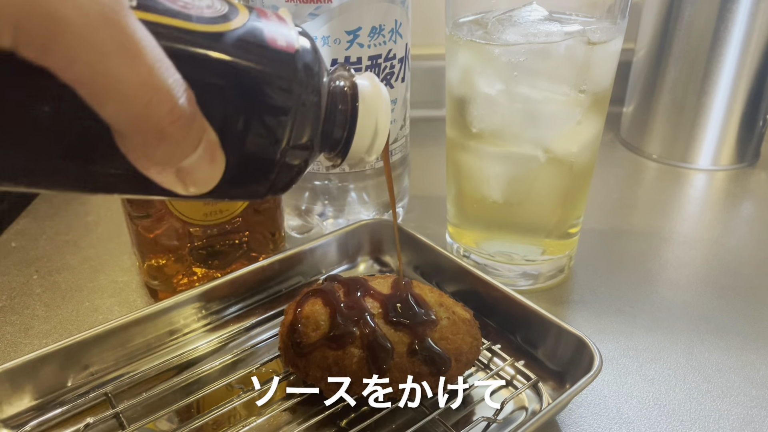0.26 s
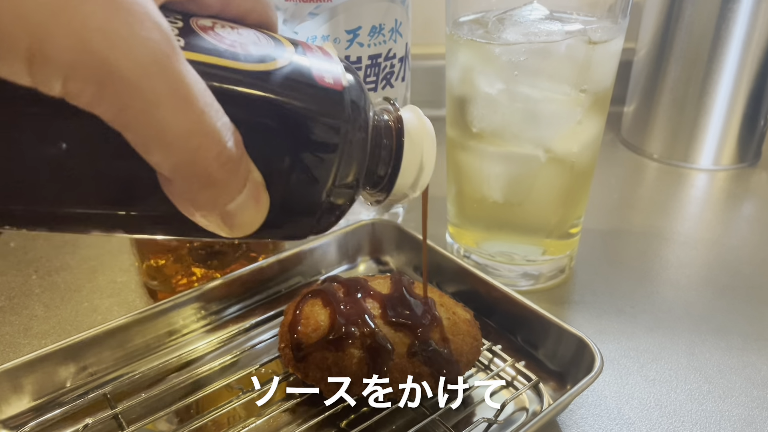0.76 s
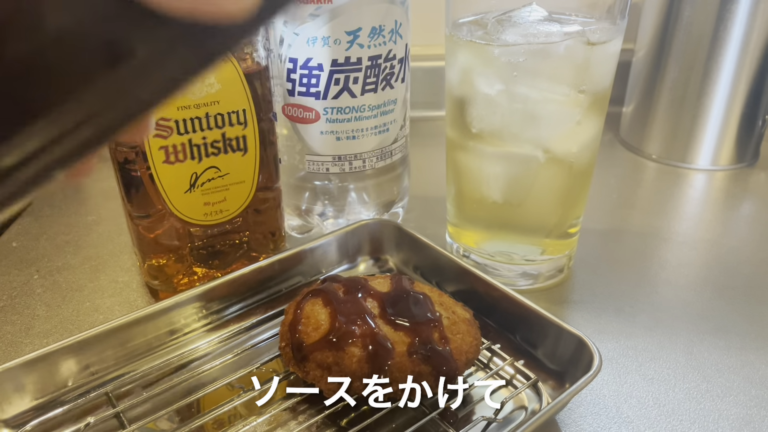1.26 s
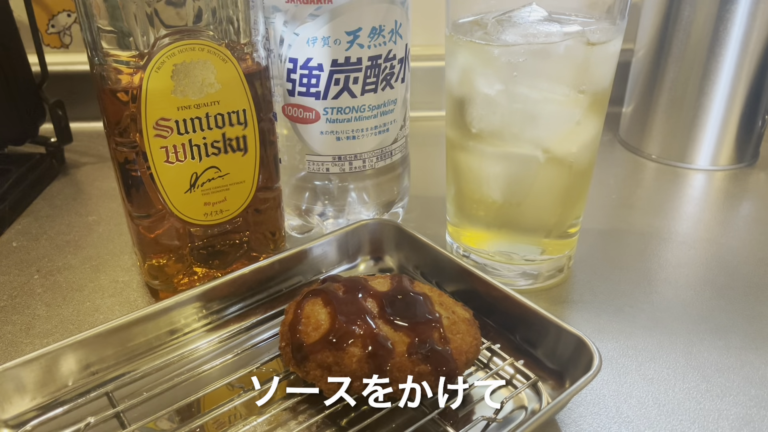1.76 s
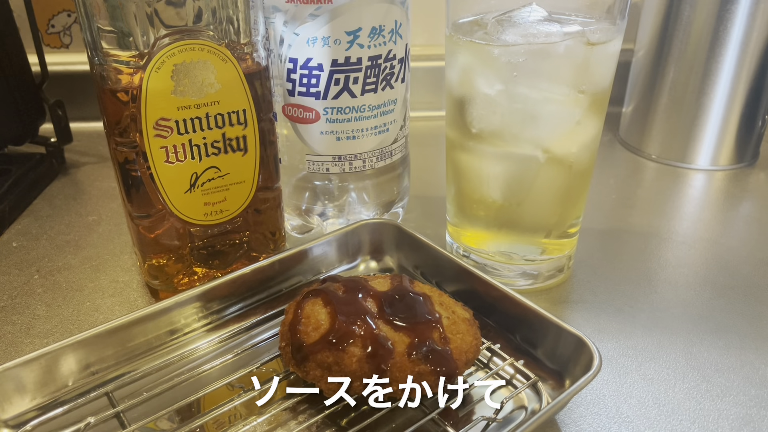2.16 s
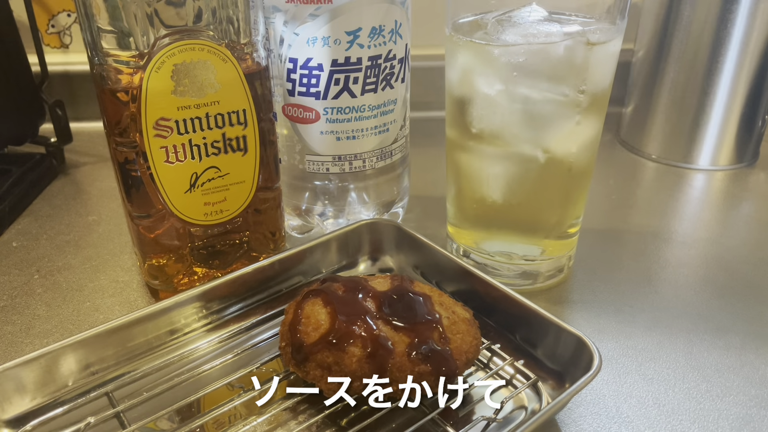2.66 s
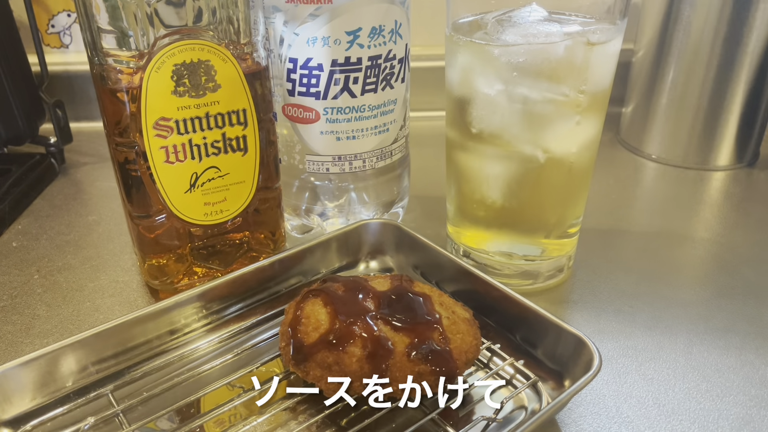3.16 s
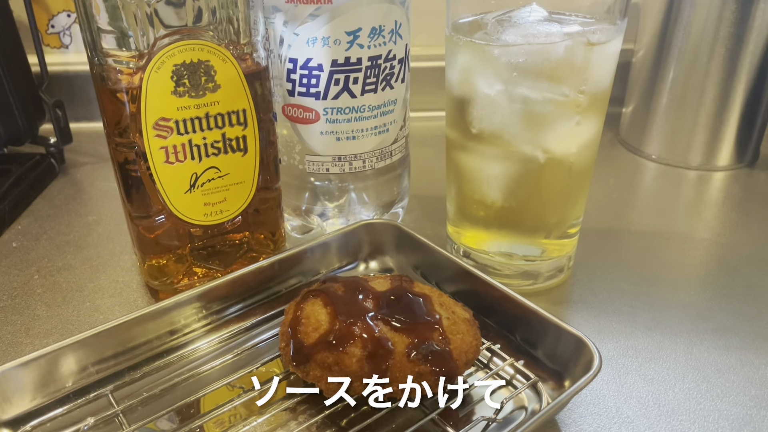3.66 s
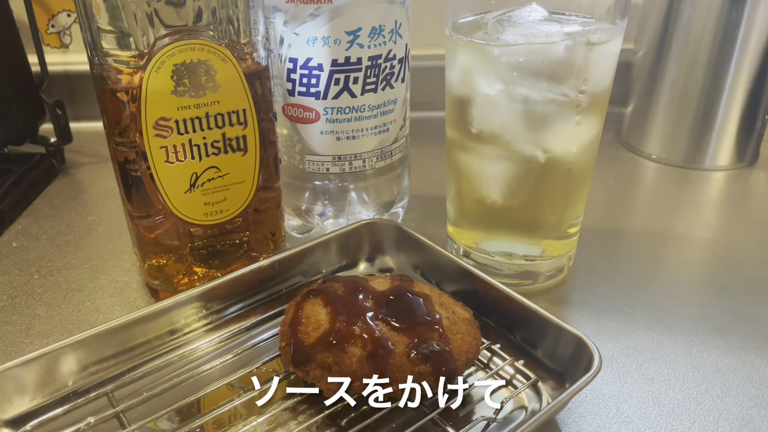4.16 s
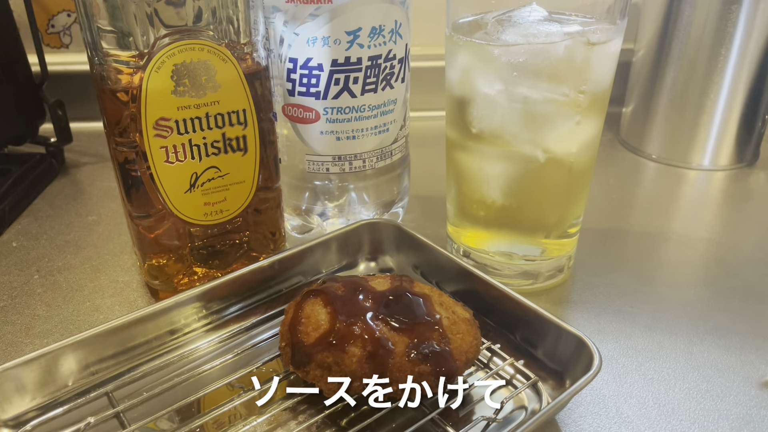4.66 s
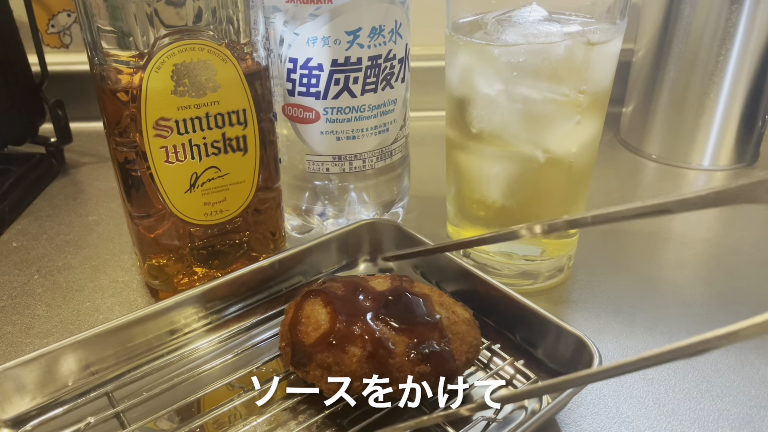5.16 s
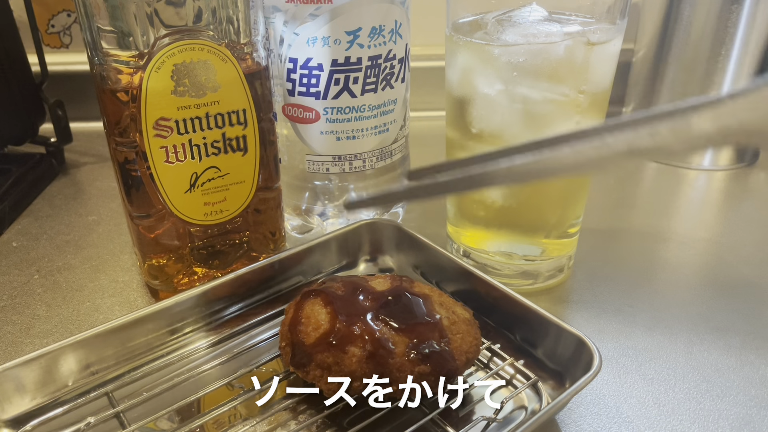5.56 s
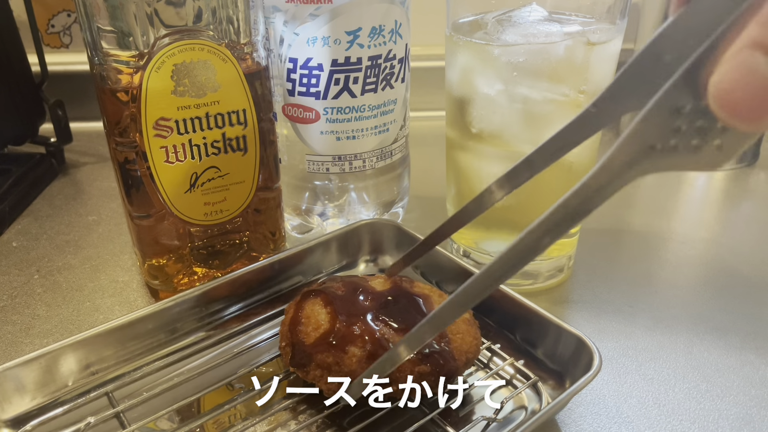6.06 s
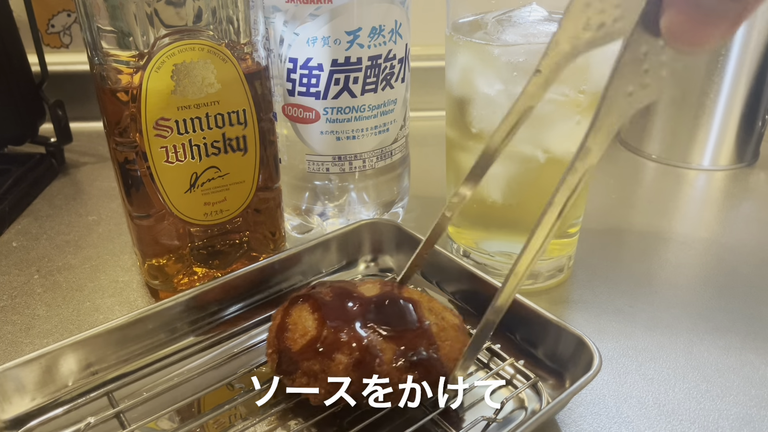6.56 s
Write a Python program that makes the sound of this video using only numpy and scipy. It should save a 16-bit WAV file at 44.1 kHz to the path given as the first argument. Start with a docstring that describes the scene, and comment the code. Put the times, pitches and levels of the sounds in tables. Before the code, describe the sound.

A plastic cap snaps shut, and the bottle rocks with a brief squeak on a shelf before landing with two loud knocks. A fridge door closes with a cushioned thud. After a short slide off the counter, metal tongs make light, dry clinks and scrapes on a rack in a steel tray. One nearby microphone picks it all up in a small kitchen, over faint fridge hum and ventilation.

```python
"""First comes the hum of a fridge over soft ventilation noise, heard from one microphone in a small kitchen.
A plastic sauce bottle is clicked shut and put away with a squeaky wobble and two hard knocks; the
fridge door thuds on its seal. Long steel tongs slide off the counter, then clink and scrape on a wire
rack in a steel tray. Blows and stick-slip friction ring each object's resonances, and nearby surfaces
and the walls answer. A faint, very high whistle swells twice."""
import sys
import numpy as np
from scipy import signal
from scipy.fft import rfft, irfft, next_fast_len
from scipy.io import wavfile
from scipy.ndimage import map_coordinates

SR = 44100
rng = np.random.default_rng(int(sys.argv[2]) if len(sys.argv) > 2 else 0)


def output_pcm(signal):
    """Save a mono or channel-first signal as 16-bit PCM at the path in sys.argv[1].

    Samples are clipped to [-1, 1] before scaling.
    """
    pcm = np.clip(np.atleast_2d(signal).T, -1, 1) * 32767
    wavfile.write(sys.argv[1], SR, np.round(pcm).astype(np.int16))


N = 300321


def amp(db):
    """Decibels to gain."""
    return 10 ** (np.asarray(db) / 20)


def unit(x):
    """Scale to rms 1."""
    return x / np.sqrt(np.mean(x ** 2) + 1e-20)


def along(points, hz):
    """Interpolate (frequency_hz, value) points on a log frequency axis."""
    f, v = np.transpose(points)
    return np.interp(np.log(hz + 1), np.log(f + 1), v)


def curves(rows):
    """One value per sample for each column after the time."""
    s, *cols = np.transpose(rows)
    return [np.interp(np.arange(N) / SR, s, c) for c in cols]


def drift(rate):
    """A smooth random curve, rate knots a second."""
    return map_coordinates(rng.standard_normal(int(N * rate / SR) + 4), [np.arange(N) * rate / SR])


def tone(hz):
    """A sine of rms 1 that follows a pitch curve."""
    return np.sqrt(2) * np.sin(2 * np.pi * np.cumsum(hz) / SR)


def filtered(x, response):
    """Pass x through a complex frequency response."""
    m = next_fast_len(len(x) + SR // 2)
    return irfft(rfft(x, m) * response(np.fft.rfftfreq(m, 1 / SR)), m)[:len(x)]


def noise(spectrum):
    """Coloured noise of rms 1."""
    return unit(filtered(rng.standard_normal(N), lambda f: amp(along(spectrum, f))))


def add(track, s, sound):
    """Mix a sound in at time s."""
    part = track[round(s * SR):]
    part[:len(sound)] += sound[:len(part)]


def body(modes, f):
    """Causal response of an object's resonances."""
    return sum((-1) ** k * amp(db) * 1j * f * width / (hz * hz - f * f + 1j * f * width)
               for k, (hz, width, db) in enumerate(modes))


def blow(modes, hard_hz, grit, grit_t60=0.024, grit_hz=4000):
    """One contact of peak 1: a gritty push rings the modes; a soft contact loses the treble."""
    t = np.arange(SR // 3) / SR
    chatter = rng.standard_normal(len(t)) * amp(-60 * t / grit_t60)
    force = (t == 0) + grit * filtered(chatter, lambda f: 1j * f / (grit_hz + 1j * f))
    ring = filtered(force, lambda f: body(modes, f) / (1 + 1j * f / hard_hz) ** 2)
    return ring / np.abs(ring).max()


def knocks(rows, modes, grit):
    """A series of blows on one object."""
    track = np.zeros(N)
    for s, db, hard_hz in rows:
        add(track, s, amp(db) * blow(modes, hard_hz, grit))
    return track


def pressure(strokes, levels_db, rise_s, fall_s):
    """Each stroke swells, holds its level from start to end, and dies away."""
    t = np.arange(N) / SR
    return sum(amp(db) * np.exp(np.minimum(t - start, 0) / rise_s - np.maximum(t - end, 0) / fall_s)
               for (start, end, *_), db in zip(strokes, levels_db))


def scrape(pressed, modes, slips_per_s, rough_db):
    """Steel sticks and slips at random, and each slip rings the modes."""
    slips = (rng.random(N) < slips_per_s / SR) * rng.standard_normal(N)
    force = unit(slips * amp(rough_db * drift(160)))
    body_rms = np.sqrt(np.mean(np.abs(body(modes, np.linspace(0, SR / 2, SR // 4))) ** 2))
    return filtered(force * pressed, lambda f: body(modes, f)) / body_rms


# The small kitchen's decay: frequency_hz, t60_s
ROOM_DECAY = [(60, 0.28), (250, 0.39), (700, 0.43), (2000, 0.35), (6000, 0.36), (14000, 0.17)]
def kitchen(x, near_db, room_db, near_t60=0.065, gap_s=0.0055):
    """At the microphone: direct sound, a quick scatter off nearby surfaces, then the room's tail."""
    hz, frame_s, spectrum = signal.stft(rng.standard_normal(SR // 2), SR, nperseg=256)
    decay = amp(-60 * frame_s / along(ROOM_DECAY, hz)[:, None])
    tail = signal.istft(spectrum * decay, SR, nperseg=256)[1]
    t = np.arange(len(tail)) / SR
    tail *= 1 - np.exp(-(t / gap_s) ** 2)
    near = rng.standard_normal(len(t)) * amp(-60 * t / near_t60) * (1 - np.exp(-t / 0.0012))
    walls = amp(near_db) * near / np.linalg.norm(near) + amp(room_db) * tail / np.linalg.norm(tail)
    return x + signal.fftconvolve(x, walls)[:N]


# Colours of the ventilation and the hiss: frequency_hz, relative_db
AIR_COLOUR = [(25, -14.5), (40, -7), (80, 1), (125, -10), (200, -10.5), (340, -13), (500, -19.5),
              (900, -22.5), (1300, -25.5), (2000, -29), (5000, -37.5), (7500, -39), (10500, -48),
              (13500, -42)]
HISS_SPECTRUM = [(200, -22), (700, 0), (1500, 1.5), (3000, -3.5), (6000, -8), (10000, -17), (15000, -20)]
# The hiss rises and falls: time_s, level_db
HISS_LEVEL = [(.6, -88), (1.4, -76), (2.9, -65), (3.8, -69.5), (4.8, -70), (5.7, -77.5), (6.8, -75.5)]
def room_tone():
    """Ventilation noise and a soft, fluttering hiss around the microphone."""
    air = amp(-59.5 + 0.62 * drift(2.5)) * noise(AIR_COLOUR)
    hiss = amp(curves(HISS_LEVEL)[0] + 0.8 * drift(11)) * noise(HISS_SPECTRUM)
    return air + hiss


# Partials of the mains hum: pitch_hz, level_db
HUM_PARTIALS = [(100, -66.5), (199.5, -68.5), (450, -78.5), (500, -79), (598, -81), (750, -81), (1050, -84),
                (1151, -82.5), (1250, -80), (1350, -80.5)]
# A low drone once the door is shut, probably the fan: time_s, pitch_hz, level_db
FAN_DRONE = [(3.65, 41.76, -43), (3.8, 50.9, -54), (4.2, 51.5, -52), (4.4, 48.3, -64), (5.2, 47.8, -59.5),
             (5.7, 49.4, -70), (6.8, 49.1, -58)]
def fridge(fan_rise_s=0.03):
    """Mains hum wavers throughout; the drone builds up as the door settles."""
    hum = sum(amp(db + 2.2 * drift(1.9)) * tone(hz + 0.8 * drift(4.6)) for hz, db in HUM_PARTIALS)
    fan_hz, fan_db = curves(FAN_DRONE)
    running = np.exp(np.minimum(np.arange(N) / SR - FAN_DRONE[0][0], 0) / fan_rise_s)
    return hum + running * amp(fan_db + 1.5 * drift(4.04)) * tone(fan_hz)


# Swells of the whistle: start_s, end_s, level_db
WHISTLE_SWELLS = [(2.7, 3.283, -73), (4.824, 5.35, -66.5)]
# Its thin strands: pitch_ratio, relative_db
WHISTLE_STRANDS = [(1.01, -1.5), (.98, -5.5), (0.91, -18), (0.772, -24)]
def whistle(crest_hz=15600, sag_hz=3000, fade_db=24, flicker_db=7):
    """A faint whistle at the top of hearing: each swell arches in pitch and level, and flickers."""
    t, track = np.arange(N) / SR, np.zeros(N)
    for start, end, db in WHISTLE_SWELLS:
        sag = np.minimum(np.abs(2 * (t - start) / (end - start) - 1), 1) ** 4  # 0 at the crest
        for ratio, relative_db in WHISTLE_STRANDS:
            waver_hz = 340 * drift(45) + 190 * drift(900)
            level_db = db + relative_db - fade_db * sag + flicker_db * drift(45)
            track += (sag < 1) * amp(level_db) * tone((crest_hz - sag_hz * sag) * ratio + waver_hz)
    return track


# Bright ticks of plastic, all on one resonance: start_s, peak_db
PLASTIC_TICKS = [(1.459, -43.5), (1.549, -49), (2.316, -32), (2.3237, -33), (2.5228, -13.5), (3.5182, -39),
                 (3.568, -45), (3.597, -55), (3.70, -41), (4.191, -42)]
# Light taps on things around the kitchen: start_s, peak_db, pitch_hz, width_hz
LIGHT_TAPS = [(0.987, -35, 1085, 900), (1.2337, -40, 1930, 100), (2.1586, -19, 4900, 600),
              (2.319, -37.5, 1083, 120), (3.5994, -29.5, 900, 800), (4.196, -40, 1000, 900),
              (4.347, -45, 1187, 710), (4.508, -34, 2200, 400)]
def handling(tick_hz=5700, tick_width_hz=3100):
    """Small contacts of plastic, steel and fingers; the lower a tap, the softer its contact."""
    track = np.zeros(N)
    for s, db in PLASTIC_TICKS:
        add(track, s, amp(db) * blow([(tick_hz, tick_width_hz, 0)], hard_hz=12000, grit=0.12))
    for s, db, hz, width in LIGHT_TAPS:
        add(track, s, amp(db) * blow([(hz, width, 0)], hard_hz=4.1 * hz, grit=0.1))
    return kitchen(track, near_db=-5.5, room_db=-6.0)


# The door meets the fridge: start_s, peak_db, hardness_hz
DOOR_BLOWS = [(3.5185, -20.5, 5000), (3.529, -25, 218), (3.549, -29, 80), (3.568, -27.5, 900),
              (3.5995, -25.5, 600)]
# Its resonances: pitch_hz, width_hz, gain_db
DOOR_MODES = [(52, 11.7, 4.5), (113.4, 30, 2.5), (146.6, 11, 7), (187.6, 18.5, -1), (266, 114, -8.5),
              (350.3, 12, -3.5), (407, 65, -18.5), (740, 88, -7.5), (900, 140, -13.5), (1370, 700, -22.5)]
def door():
    """The fridge door lands on its soft seal and shudders; plenty of room makes it sound farther off."""
    return kitchen(knocks(DOOR_BLOWS, DOOR_MODES, grit=0.088), near_db=-2.0, room_db=-3.5)


# The tongs drag over the counter: start_s, end_s, counter_db, cabinet_db, tips_db
COUNTER_SLIDES = [(4.377, 4.401, -35.5, -35.5, -58), (4.452, 4.509, -51.5, -49, -62),
                  (4.56, 4.674, -73, -73.5, -65.5)]
# Resonances of counter top, cabinet and steel tips: pitch_hz, width_hz, gain_db
COUNTER_MODES = [(635, 240, -5.5), (1000, 91, 3.5), (1150, 240, -3.5), (1650, 350, -7), (2150, 800, -13.5),
                 (3370, 120, -17), (3580, 34, -7), (5640, 1040, -20), (6800, 100, -16.5), (8000, 1100, -25),
                 (14000, 2000, -33)]
CABINET_MODES = [(166, 31, -3), (270, 24, 0), (341, 35, 1.5), (428, 107, 1), (505, 60, -2)]
TIP_MODES = [(3260, 960, 4), (5000, 2300, 3), (6800, 1600, 3.5), (8940, 1100, 0.5), (12000, 3700, -8),
             (15200, 1300, 0)]
def tongs_off_counter():
    """The tongs slide off the counter, which rings with the cabinet below it."""
    on_top, on_cabinet, on_tips = (pressure(COUNTER_SLIDES, db, rise_s=0.015, fall_s=0.013)
                                   for db in np.transpose(COUNTER_SLIDES)[2:])
    counter = scrape(on_top, COUNTER_MODES, slips_per_s=2500, rough_db=1.7)
    cabinet = scrape(on_cabinet, CABINET_MODES, slips_per_s=900, rough_db=2.4)
    tips = scrape(on_tips, TIP_MODES, slips_per_s=3000, rough_db=0.98)
    return kitchen(counter + cabinet + tips, near_db=-20, room_db=-9.5)


# Strokes on the rack: start_s, end_s, clink_db, arms_db, tips_db, tray_db, rack_db
RUBS = [(6.1613, 6.219, -41.5, -55.5, -64, -56, -74), (6.354, 6.382, -38, -54, -59, -43.5, -66),
        (6.426, 6.448, -46, -55.5, -60, -52, -53.5), (6.5125, 6.53, -41.5, -58, -56.5, -51.5, -61),
        (6.551, 6.63, -52, -63.5, -62.5, -55, -59), (6.635, 6.668, -59, -66, -65, -55, -51),
        (6.686, 6.76, -65.5, -76.5, -76.5, -65, -60.5)]
# Resonances of the tongs' arms, steel tray and wire rack: pitch_hz, width_hz, gain_db
ARM_MODES = [(2354, 74, 4), (3280, 53, 0), (4180, 51, -2), (4700, 290, -5.5), (5470, 94, 2.5),
             (5590, 150, -3), (6310, 58, -1), (6880, 100, -3), (7670, 75, 0.5), (9090, 69, 0.5),
             (9740, 43, -10), (10400, 74, -7), (12000, 140, -6.5), (14200, 110, -4), (15550, 160, -9)]
TRAY_MODES = [(110, 45, 2), (160, 65, 3), (222, 39, 3.5), (283, 42, -0.5), (446, 74, -0.5),
              (600, 144, -1.5), (800, 120, -2.5), (1000, 130, -5.5), (1560, 310, -9), (2200, 630, -10.5),
              (3520, 450, -16)]
RACK_MODES = [(1000, 200, -33), (1550, 790, -5), (2160, 97, 9.5), (2351, 80, 5.5), (2920, 700, -2.5),
              (3540, 240, -0.5), (4470, 430, -7)]
def tongs_on_rack(clink_hard_hz=13000, bump_hard_hz=1800, bump_above_db=10, spread_db=2.5):
    """Close and dry: each landing clinks the arms and bumps the tray, then all the steel rubs."""
    starts, _, clink_db, arms_db, tips_db, tray_db, rack_db = np.transpose(RUBS)
    bite = dict(rise_s=0.0047, fall_s=0.015)  # the tips bite and let go
    follow = dict(rise_s=0.0044, fall_s=0.018)  # tray and rack die away more slowly
    clinks = knocks([(s, db, clink_hard_hz) for s, db in zip(starts, clink_db)], ARM_MODES, grit=0.14)
    landings = [(s, db + bump_above_db, bump_hard_hz) for s, db in zip(starts, tray_db)]
    bumps = knocks(landings, TRAY_MODES, grit=0.085)
    arms = np.zeros(N)
    for rub, level_db in zip(RUBS, arms_db):
        # each point of contact favours different modes
        touched = [(hz, width, db + spread_db * rng.standard_normal()) for hz, width, db in ARM_MODES]
        arms += scrape(pressure([rub], [level_db], **bite), touched, slips_per_s=2100, rough_db=4.6)
    # the pressed tips hardly ring: a dry, grainy scratch
    tips = scrape(pressure(RUBS, tips_db, **bite), TIP_MODES, slips_per_s=1800, rough_db=3.5)
    tray = scrape(pressure(RUBS, tray_db, **follow), TRAY_MODES, slips_per_s=900, rough_db=0.63)
    rack = scrape(pressure(RUBS, rack_db, **follow), RACK_MODES, slips_per_s=2200, rough_db=1.8)
    return kitchen(clinks + bumps + arms + tips + tray + rack, near_db=-12, room_db=-13)


# The bottle's base chirps as it slides on the shelf: start_s, peak_db
BASE_SQUEAKS = [(2.158, -15), (2.1696, -16.5), (2.185, -30)]
def squeaks(pitch_hz=1333.4, length_s=0.0076, grip_hz=2600, grip_width_hz=3000):
    """Plastic grips with a tick and lets go in a short swell of one pitch."""
    track = np.zeros(N)
    t = np.arange(round(length_s * SR)) / SR
    chirp = np.sin(np.pi * t / length_s) ** 2 * np.sin(2 * np.pi * pitch_hz * t)
    for s, db in BASE_SQUEAKS:
        grip = blow([(grip_hz, grip_width_hz, 0)], hard_hz=9000, grit=0.15)
        add(track, s, amp(db) * chirp)
        add(track, s + 0.0012, amp(db - 14) * grip)
    return track


# Blows of the cap, the rocking bottle, the shelf rail and the last drop: start_s, peak_db, hardness_hz
CAP_BLOWS = [(1.2695, -31.5, 9000), (1.2715, -18, 6000)]
ROCKING_BLOWS = [(2.101, -12, 6000), (2.1066, -14, 9000), (2.19, -20, 6000), (2.197, -25, 1500)]
RAIL_BLOWS = [(2.190, -29, 16070), (2.1935, -21, 14000), (2.348, -19.5, 14000), (2.3504, -16.5, 6000),
              (2.3515, -5.5, 6000)]
SEAT_BLOWS = [(2.524, -1, 12000), (2.5255, -14, 2954), (2.531, -12, 6000)]
# The resonances they ring, in the same order: pitch_hz, width_hz, gain_db
CAP_MODES = [(202, 53, -3), (400, 95, -2.5), (538, 98, -3), (1500, 146, 1), (2200, 180, 0),
             (4050, 960, -18), (5540, 1100, -18.5)]
BOTTLE_MODES = [(350, 60, -15), (1240, 320, -1), (1440, 280, 1), (1890, 500, -15.5), (3500, 300, -23),
                (4900, 1100, -24.5), (7000, 1700, -32)]
SHELF_MODES = [(88, 34, -3), (190.3, 70, -3), (350, 61, -4), (620, 210, -3.5), (880, 200, -3),
               (1320, 360, -8), (2270, 260, 0), (2600, 220, -1.5), (3600, 470, 0), (4900, 700, -6.5),
               (6302, 920, -10), (8700, 1700, -16.5), (14480, 2500, -23)]
SEAT_MODES = [(94, 26, -5.5), (180, 80, -6.5), (292.7, 120, -2.5), (572.7, 160, -8), (720, 220, -7),
              (1393, 250, 0), (1544, 270, -3), (2088, 160, -6.5), (4000, 1400, -20), (6000, 1400, -24.5),
              (7900, 950, -21), (15500, 1500, -26.5)]
def bottle(thump_db=-13.5, thump_hard_hz=600):
    """The cap clicks shut close by; the bottle rocks on a shelf, knocks its rail and drops into place."""
    cap = kitchen(knocks(CAP_BLOWS, CAP_MODES, grit=0.06), near_db=-11, room_db=-13)
    wobbles = knocks(ROCKING_BLOWS, BOTTLE_MODES, grit=0.247) + squeaks()
    rocking = kitchen(wobbles, near_db=-14, room_db=-11)
    thumps = [(s, db + thump_db, thump_hard_hz) for s, db, _ in ROCKING_BLOWS]  # felt by the shelf
    shelf = kitchen(knocks(thumps + RAIL_BLOWS, SHELF_MODES, grit=0.12), near_db=-8.5, room_db=-10)
    seated = kitchen(knocks(SEAT_BLOWS, SEAT_MODES, grit=0.23), near_db=-5.5, room_db=-3.0)
    return cap + rocking + shelf + seated


def scene():
    """Everything at one microphone in the kitchen."""
    action = handling() + bottle() + door() + tongs_off_counter() + tongs_on_rack()
    return (action + whistle() + room_tone() + fridge())[None]


def record(dry, bass_hz=30, top_hz=15900):
    """The microphone sheds the deepest bass; the recorder clips at full scale and has a band limit."""
    heard = signal.sosfilt(signal.butter(3, bass_hz, "high", fs=SR, output="sos"), dry[0])
    return filtered(np.clip(heard, -1, 1), lambda hz: 1 / (1 + (hz / top_hz) ** 200))[None]


dry = scene()
out = record(dry)
output_pcm(out)
```